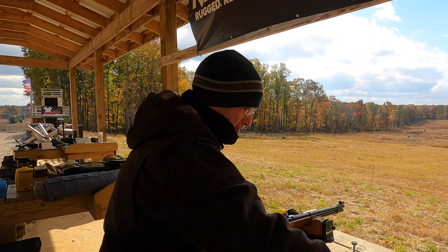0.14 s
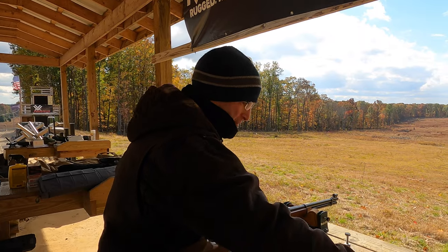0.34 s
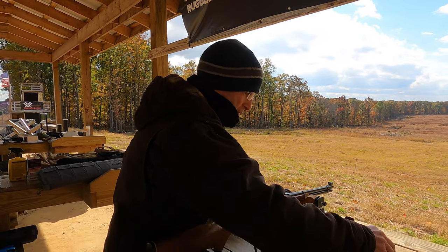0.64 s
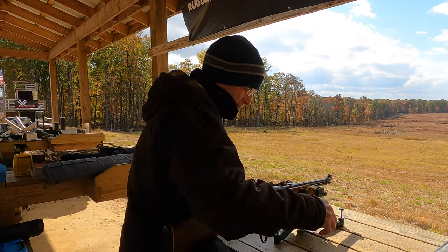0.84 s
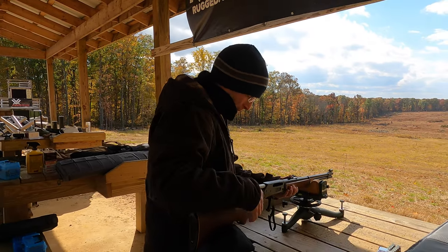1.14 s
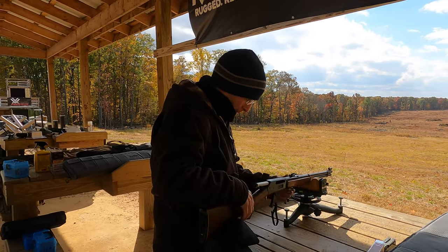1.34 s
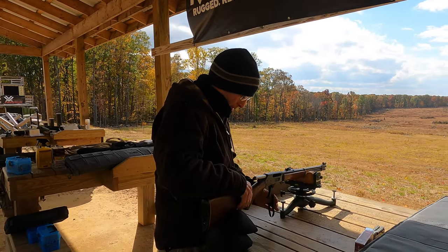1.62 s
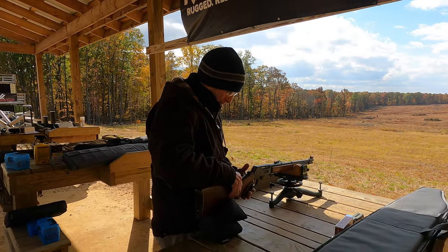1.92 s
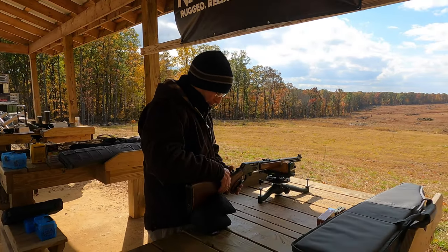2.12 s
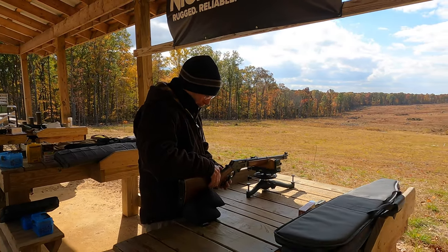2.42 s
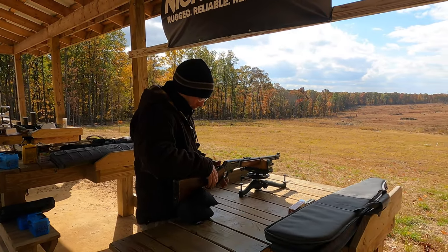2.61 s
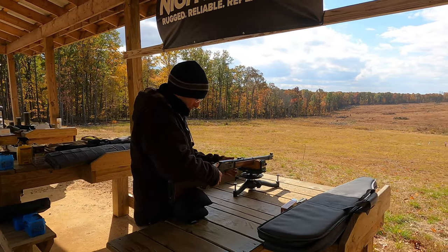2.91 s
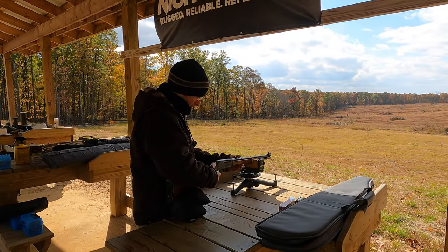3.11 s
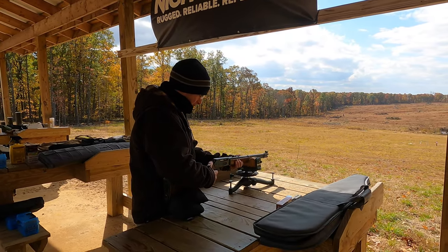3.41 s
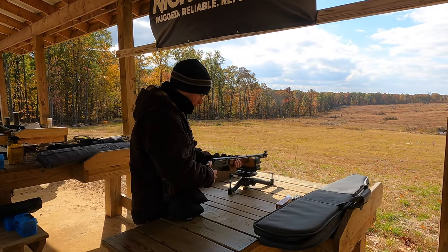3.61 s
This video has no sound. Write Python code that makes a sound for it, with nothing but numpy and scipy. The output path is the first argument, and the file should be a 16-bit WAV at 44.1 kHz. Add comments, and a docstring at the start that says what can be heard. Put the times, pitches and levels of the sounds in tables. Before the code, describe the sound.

A lever-action rifle clatters open and snaps shut, with wind buffeting the microphone.

```python
"""A lever-action rifle clatters open and snaps shut on a wooden bench under an open shelter.
Each click makes the steel ring, and the hardest ones knock the wooden stock. Before that, a fingertip
ticks on a brass cartridge, which lands and bounces on the bench, and a sleeve brushes past.
The shelter adds a short echo. Wind pushes and thumps on the microphone over a steady hiss."""
import sys
import numpy as np
from scipy import signal
from scipy.fft import rfft, irfft
from scipy.io import wavfile
from scipy.ndimage import uniform_filter1d

SR = 44100
rng = np.random.default_rng(int(sys.argv[2]) if len(sys.argv) > 2 else 0)


def to_wav(sig):
    """Store sig (one row per channel, or 1-D mono) as 16-bit WAV at the path in sys.argv[1].

    Samples outside -1..1 are clipped; the rate is SR.
    """
    pcm = np.clip(np.atleast_2d(sig), -1, 1) * 32767
    pcm = np.round(pcm).astype(np.int16)
    wavfile.write(sys.argv[1], SR, pcm.T)  # frames by channels


N = 165375
DETUNE = 0.012  # steel and bench tones stray by about this share of their pitch at each hit


def amp(db):
    """Turns a level in dB into a number to multiply by."""
    return 10 ** (np.asarray(db) / 20)


def evened(x):
    """Scales a signal so that its average power is 1."""
    return x / np.sqrt(np.mean(x ** 2) + 1e-20)


def read(points, hz):
    """Looks up a value between rows of (Hz, value), on a scale of octaves."""
    row_hz, value = np.transpose(points)
    return np.interp(np.log(hz + 1), np.log(row_hz + 1), value)


def coloured(x, spectrum):
    """Makes each frequency louder or softer, following rows of (Hz, dB)."""
    hz = np.fft.rfftfreq(len(x), 1 / SR)
    return irfft(rfft(x) * amp(read(spectrum, hz)), len(x))


def add(mix, start_s, sound):
    """Mixes a sound in at its start time."""
    part = mix[round(start_s * SR):][:len(sound)]
    part += sound[:len(part)]


def ring(tones, stretch=0.99, colour=((1, 0), (20000, 0)), detune=0., rise_s=0.00058):
    """A struck object rings with several tones, each falling 60 dB in its fade time times stretch."""
    hz, db, fade_s = np.transpose(tones)[:, :, None]
    t = np.arange(8192) / SR
    sign = rng.choice([-1., 1.], hz.shape)
    cycles = hz * (1 + detune * rng.standard_normal(hz.shape)) * t
    loudness = amp(db + read(colour, hz) - 60 * t / (fade_s * max(stretch, .1)))
    waves = sign * loudness * np.sin(2 * np.pi * cycles)
    return waves.sum(0) * np.minimum(t / rise_s, 1)


def crack(colour, fade_s, rise_s=0.00019):
    """A hit gives a short burst of noise that falls 60 dB in its fade time."""
    t = np.arange(8192) / SR
    noise = coloured(rng.standard_normal(8192), colour)
    return noise * amp(-60 * t / fade_s) * np.minimum(t / rise_s, 1)


def wind():
    """Moving air presses on the microphone: a slow push, a buffeting and a quicker flutter."""
    # Each row: time in seconds, then the levels of push, buffeting and flutter in dB.
    gusts = [(0.0, -46.5, -42, -50.5), (0.31, -29, -37.5, -57.5), (0.4, -23, -30.5, -47.5),
             (0.64, -31, -40.5, -45), (0.7, -19, -64, -69), (0.83, -27, -31, -45), (0.91, -31.5, -43, -61),
             (1.2, -21, -39.5, -50.5), (1.23, -20.5, -44, -49.5), (1.4, -24, -40, -62),
             (1.45, -26.5, -37.5, -40), (1.63, -25.5, -36.5, -54), (1.79, -31.5, -47, -58),
             (1.88, -35.5, -40.5, -41), (2.07, -37, -33.5, -47.5), (2.73, -39.5, -49.5, -67),
             (3.01, -38.5, -36.5, -49.5), (3.38, -31, -52, -63.5), (3.75, -46, -43.5, -57.5)]
    # Each row of these three: frequency in Hz, relative level in dB.
    push = [(2, -1), (7, 3.5), (14, -13), (22, -9), (30, -53.5)]
    buffet = [(12, 20.5), (21, -2), (28, 6.5), (45, 3), (70, -33)]
    flutter = [(40, -44), (58, 4), (90, -10.5), (140, -18.5), (260, -34), (400, -42)]
    times, *levels = np.transpose(gusts)
    t, out = np.arange(N) / SR, np.zeros(N)
    for spectrum, db, span_s in zip((push, buffet, flutter), levels, (.3, .14, .1)):
        noise = coloured(rng.standard_normal(N), [(0.018, -103)] + spectrum + [(800, -120)])
        local_power = abs(uniform_filter1d(noise ** 2, int(span_s * SR)))
        steady = noise / np.sqrt(local_power + 1e-20)
        out += steady * amp(np.interp(t, times, db))
    return out


def hiss(patchy_db=0.87):
    """The open field rustles and the microphone adds its own noise, in faint drifting patches."""
    # Each row: frequency in Hz, relative level in dB.
    colour = [(88, -11), (150, -4.5), (450, -6.5), (805, -9.5), (1530, -9.5), (1690, -11.5), (4160, -15.5),
              (7770, -22), (9630, -29.5), (16000, -34)]
    # Each row: time in seconds, level in dB.
    levels = [(0.0, -60), (0.85, -59), (2.2, -58), (2.41, -59), (3.75, -58.5)]
    noise = coloured(rng.standard_normal(N), [(60, -57)] + colour)
    _, _, bands = signal.stft(noise, SR, nperseg=512)
    patches = uniform_filter1d(rng.standard_normal(bands.shape), 8, 0)  # smooth across frequency
    patches = evened(uniform_filter1d(patches, 12, 1))  # and across time
    patchy = signal.istft(bands * amp(patchy_db * patches), SR, nperseg=512)[1][:N]
    return evened(patchy) * amp(np.interp(np.arange(N) / SR, *np.transpose(levels)))


def thumps(cycles=1.93, sag=0.61):
    """A swirl of air sucks the microphone's membrane in and lets it swing back, dropping in pitch."""
    # Each row: start in seconds, peak level in dB, starting pitch in Hz.
    swirls = [(0.171, -34, 59), (0.397, -35, 59.7), (0.468, -31.5, 58.3), (0.507, -30.5, 60.6),
              (0.606, -32, 62), (0.819, -31, 60), (0.99, -31, 54.3), (1.162, -27.5, 57), (1.443, -25, 64),
              (1.488, -26, 61.6), (1.835, -29, 61), (3.019, -43, 62)]
    out = np.zeros(N)
    for start, db, hz in swirls:
        progress = np.arange(0, 1, hz / (cycles * SR))
        swing = np.cos(2 * np.pi * cycles * (progress - .5 * sag * progress ** 2))
        swell = np.sin(np.pi * progress ** 0.72) ** 2
        add(out, start, amp(db) * swing * swell)
    return out


def fingertip():
    """A fingertip lets go of the cartridge with tiny, bright ticks."""
    # Each row: start in seconds, level in dB.
    ticks = [(.5097, -36), (0.5164, -34.5), (0.522, -41)]
    # Each row: pitch in Hz, relative level in dB, fade time in seconds.
    tones = [(3380, -5.5, 0.0095), (6140, -0.5, 0.0037), (8300, -13, 0.0055), (12700, -26.5, .06)]
    out = np.zeros(N)
    for start, db in ticks:
        add(out, start, amp(db) * ring(tones))
    return out


def cartridge():
    """The cartridge lands and bounces: its brass rings high and thin while the bench knocks under it."""
    # Each row: start in seconds, levels of brass, bench and crack in dB, stretch of the brass ring.
    bounces = [(0.5550, -35.5, -63, -41.5, 0.13), (0.558, -33, -68, -43, 0.14),
               (0.5668, -20, -28.5, -29, 0.28), (0.6006, -40.5, -41, -48, 0.25), (0.619, -61, -46, -56, 1),
               (0.852, -80, -57.5, -70, .5)]
    # Each row of these two: pitch in Hz, relative level in dB, fade time in seconds.
    brass_tones = [(12590, 3, 0.11), (11460, -9.5, 0.017), (14000, -9, .03), (15000, -14, .025)]
    bench_tones = [(206, -13, 0.098), (274, -17, 0.092), (544, -5.5, 0.034), (738, -8, 0.041),
                   (1012, 1, 0.026), (1130, 0.5, 0.048), (1264, -7.5, 0.069), (1420, -2, 0.035),
                   (1542, -5.5, 0.044), (2017, -13, 0.083), (2350, -13, 0.067), (3660, -3, 0.0086)]
    crack_colour = [(500, -20.5), (3000, 6.5), (6000, -2.5), (10000, -4.5), (16000, -27)]
    out = np.zeros(N)
    for start, brass_db, bench_db, crack_db, stretch in bounces:
        burst = amp(crack_db) * crack(crack_colour, fade_s=0.042)
        brass = amp(brass_db) * ring(brass_tones, stretch)
        bench = amp(bench_db) * ring(bench_tones, detune=DETUNE)
        add(out, start, brass + bench + burst)
    return out


def shelter(sound, build_up_s=.014):
    """Roof and benches scatter a sound into a short echo, each frequency fading at its own speed."""
    # Each row: frequency in Hz, seconds to fade by 60 dB.
    fade_times = [(300, 0.26), (1200, 0.13), (2500, 0.071), (6000, 0.15), (12000, 0.1)]
    hz, t, bands = signal.stft(rng.standard_normal(SR // 2), SR, nperseg=128)
    fade = amp(-60 * t / read(fade_times, hz)[:, None])
    echo = signal.istft(bands * fade, SR, nperseg=128)[1]
    echo *= np.minimum(np.arange(len(echo)) / (build_up_s * SR), 1) ** 2
    return signal.fftconvolve(sound, echo / np.linalg.norm(echo))[:N]


def sleeve():
    """A sleeve brushes past with a faint, bright rustle that swells and fades."""
    # Each row: loudest moment in seconds, spread in seconds, level in dB.
    swishes = [(.82, 0.047, -67.5), (1.16, 0.14, -72)]
    # Each row: frequency in Hz, relative level in dB.
    colour = [(2500, -35), (6500, 10), (9500, -5), (12500, -3), (16000, -27)]
    t = np.arange(N) / SR
    swell = sum(amp(db) * np.exp(-.5 * ((t - peak) / spread) ** 2) for peak, spread, db in swishes)
    return swell * evened(coloured(rng.standard_normal(N), colour))


def lever_action():
    """Steel parts click as the lever moves and snap as it locks shut; each hit cracks and rings."""
    # Each row of these two: start in seconds, low, middle, high and top levels in dB, fade stretch.
    clicks = [(1.68, -68, -50, -46.5, -63, 1.1), (1.8216, -45, -48, -66, -72, 1.7),
              (1.8441, -33, -33, -40.5, -74, 2), (1.8541, -53, -33, -34, -47, 0.96),
              (1.8640, -44, -32, -24.5, -60, 0.43), (1.8722, -70, -24, -43, -54, 1.2),
              (1.8768, -28, -38, -24.5, -46, 0.79), (1.8803, -24, -4, -27, -40, 0.39),
              (1.8872, -61, -12, -21.5, -41, 0.53), (1.8888, -24.5, -11.5, -29, -46, 0.34),
              (1.9002, -45, -55, -46, -59, 0.35), (1.925, -65, -54, -42, -41, 0.89),
              (1.9370, -60, -30, -37, -50, 0.98), (1.9397, -27, -17.5, -25, -30.5, 0.51),
              (1.9445, -49, -24.5, -37, -42, 1.7), (1.959, -35, -18.5, -24, -25, 0.69),
              (1.9640, -29.5, -19.5, -29, -55, 0.4), (3.1402, -58, -42.5, -36, -62, 0.73),
              (3.2760, -70, -62, -49, -54, .6), (3.4531, -74, -41.5, -33.5, -56, 0.49)]
    snaps = [(2.2352, -40, -38, -43, -41, 0.58), (2.2384, -23.5, -18.5, -21, -26.5, 0.61),
             (2.2480, -44, -31, -33.5, -42, 0.9), (2.2560, -46, -43, -41, -43, 0.57)]
    # Where low, middle, high and top lie, in Hz.
    bands_hz = [800, 2100, 6000, 12500]
    # Each row of these two: pitch in Hz, relative level in dB, fade time in seconds.
    lever_tones = [(805, 4, 0.023), (1046, -3.5, 0.04), (1568, -6, 0.052), (1733, -10, 0.067),
                   (1734, -3.5, 0.057), (1924, -1.5, 0.03), (2050, -4, 0.035), (2270, 0, 0.021),
                   (2680, -4, 0.036), (2870, -8.5, 0.044), (3850, 4.5, 0.0064), (4640, -4, 0.0043),
                   (6190, 0, 0.012), (6720, -10, 0.047), (7900, 1, 0.015), (13000, -11, .014)]
    lock_tones = [(756, 8.5, 0.014), (1527, -2, 0.037), (2920, 0.5, 0.023), (3550, -3.5, 0.019),
                  (4650, 3, 0.013), (6390, 1.5, 0.014), (7600, 7, 0.0084), (13250, 11, 0.01)]
    low_hz, *upper_hz = bands_hz
    out = np.zeros(N)
    for hits, tones in ((clicks, lever_tones), (snaps, lock_tones)):
        for start, low_db, *upper_db, stretch in hits:
            upper_colour = list(zip(upper_hz, upper_db)) + [(16000, upper_db[-1] - 5)]
            steel = ring(tones, stretch, [(low_hz, low_db)] + upper_colour, DETUNE)
            crack_colour = [(250, low_db - 6), (low_hz, low_db + 5)] + upper_colour
            burst = crack(crack_colour, fade_s=0.038 * max(stretch, .1))
            add(out, start, amp(-7.5) * steel + amp(-3.5) * burst)
    return out


def stock():
    """The hardest hits reach the rifle's wooden stock, which gives a low, dry knock."""
    # Each row: start in seconds, level in dB, stretch of the ring.
    knocks = [(1.881, -36.5, 0.63), (1.8893, -35.5, 0.51), (1.962, -40.5, 0.54), (2.241, -40.5, 1.02),
              (2.292, -48.5, .9)]
    # Each row: pitch in Hz, relative level in dB, fade time in seconds.
    wood_tones = [(122, -0.5, 0.13), (323.6, 2, 0.13), (541, -1.5, 0.061)]
    out = np.zeros(N)
    for start, db, stretch in knocks:
        add(out, start, amp(db) * ring(wood_tones, stretch))
    return out


def scene():
    """Mixes everything into one channel; only the action, cartridge and fingertip get the echo."""
    handling = lever_action() + cartridge() + fingertip()
    echo = amp(-10.5) * shelter(handling)
    return (handling + echo + stock() + wind() + thumps() + sleeve() + hiss())[None]


def record(dry):
    """Cuts away the very highest treble."""
    cutoff_hz = 15850
    low_pass = signal.firwin(511, cutoff_hz, window=("kaiser", 9), fs=SR)
    return signal.oaconvolve(dry, low_pass[None], "same")


dry = scene()
out = record(dry)
to_wav(out)
```